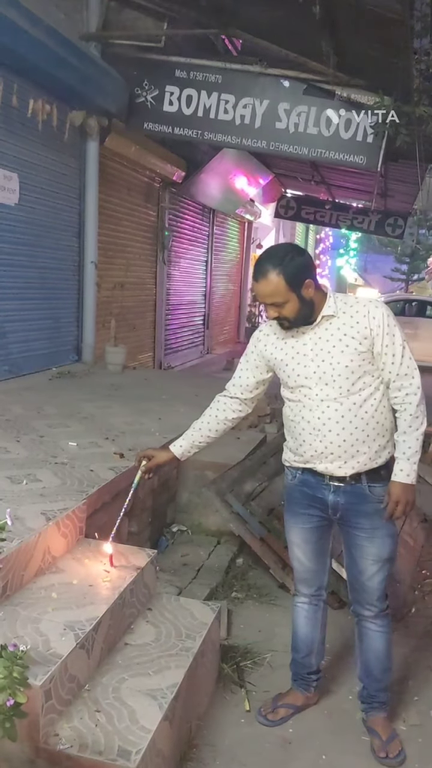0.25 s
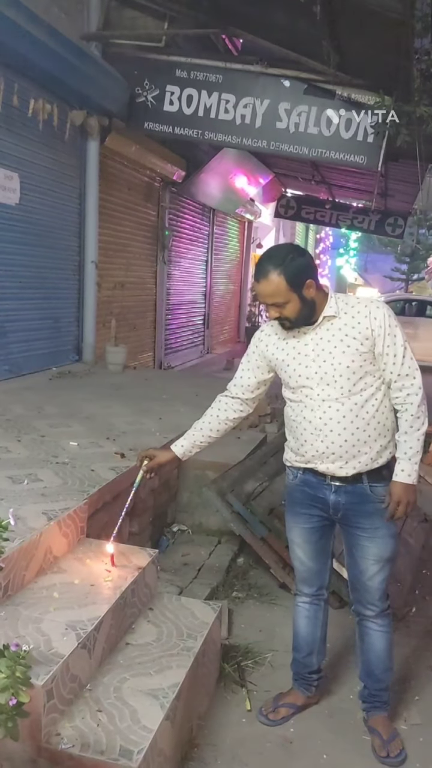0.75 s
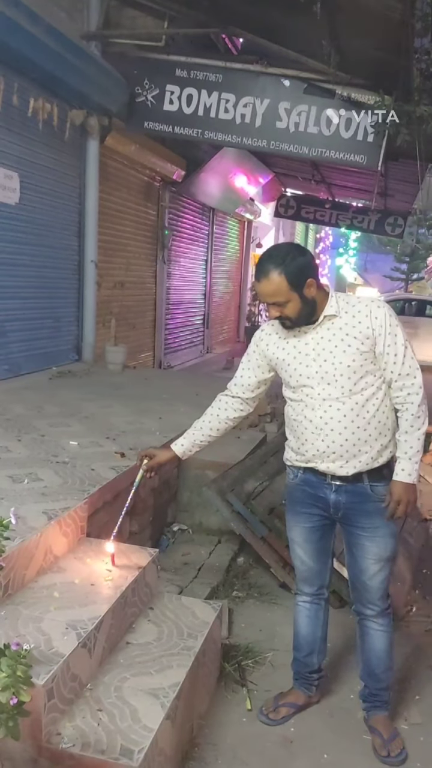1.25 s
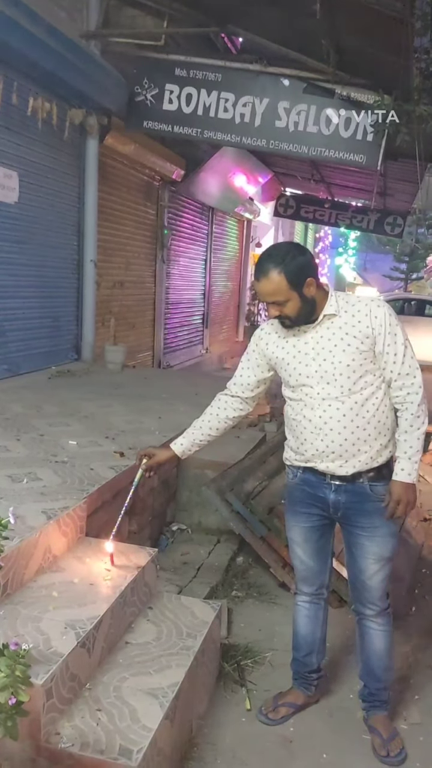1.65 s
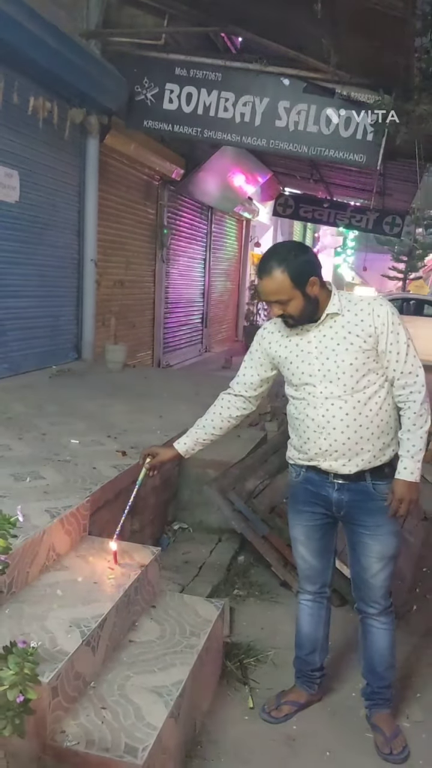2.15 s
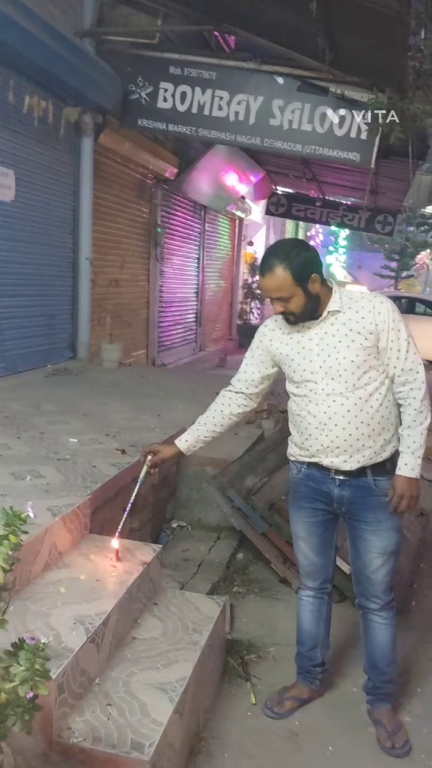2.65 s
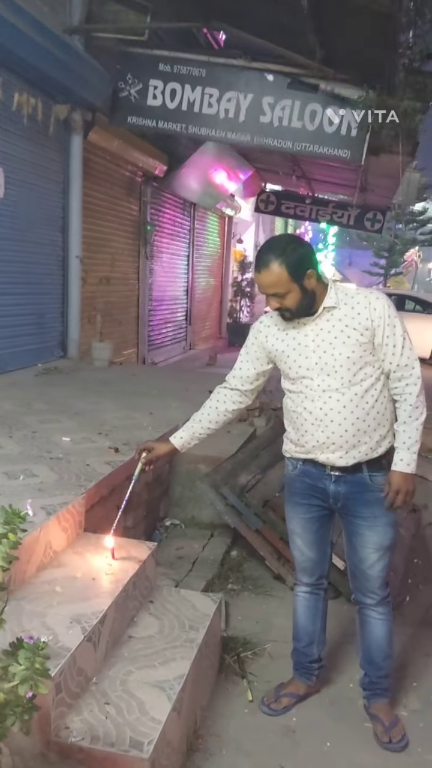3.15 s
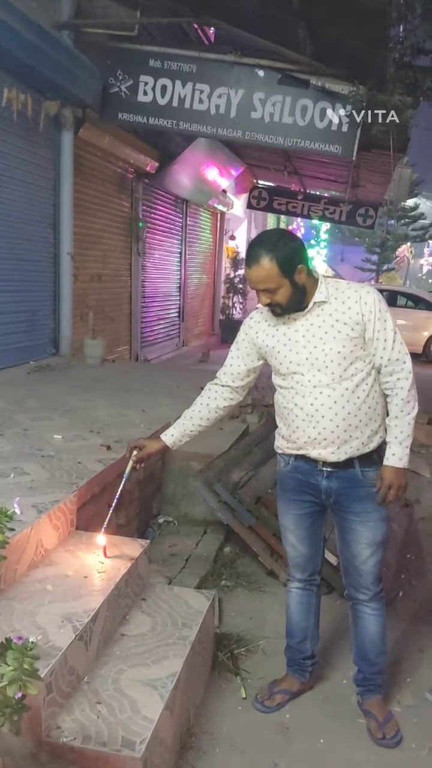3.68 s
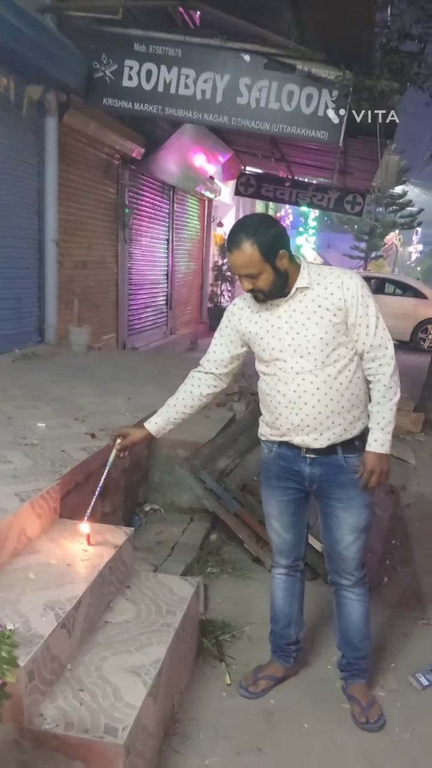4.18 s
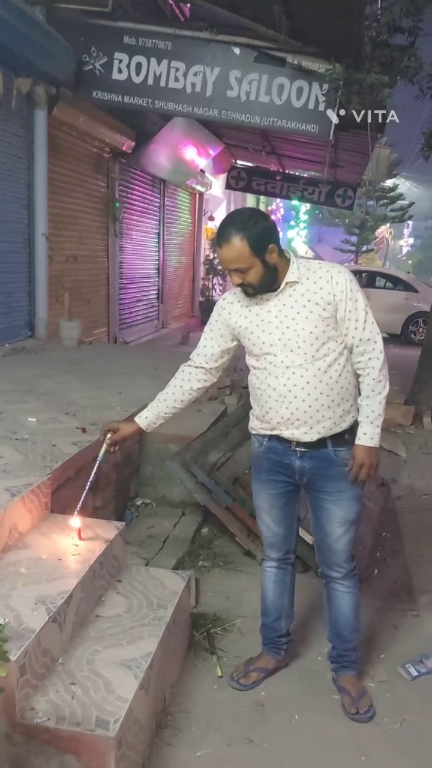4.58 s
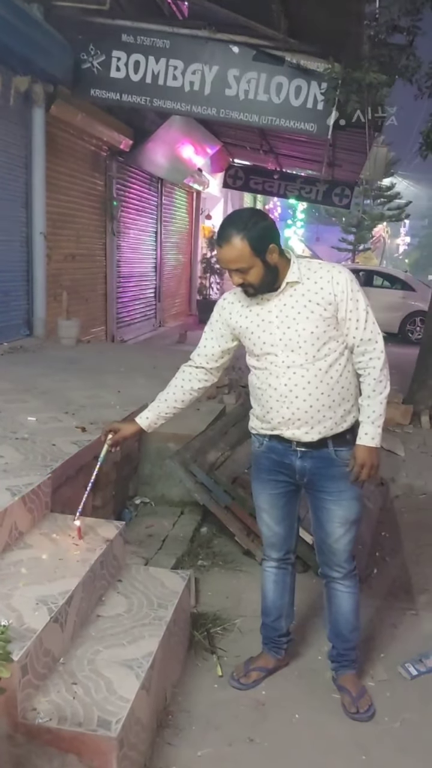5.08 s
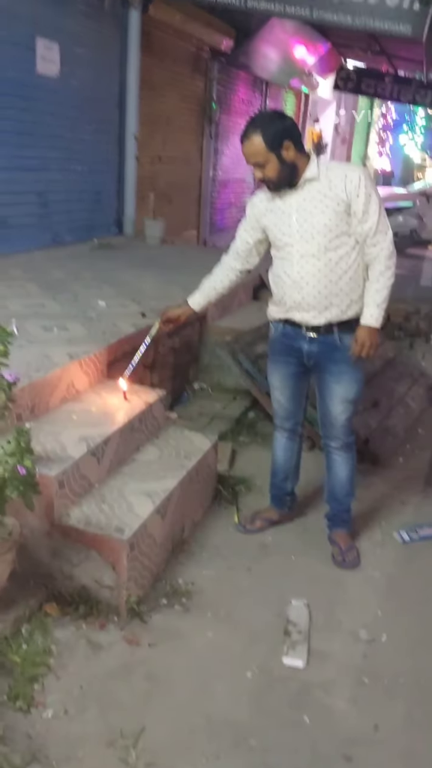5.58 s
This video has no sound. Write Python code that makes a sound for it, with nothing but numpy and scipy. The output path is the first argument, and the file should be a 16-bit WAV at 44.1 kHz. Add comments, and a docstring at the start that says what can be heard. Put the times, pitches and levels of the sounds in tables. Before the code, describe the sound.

A night street between houses, heard in stereo through a handheld microphone. Two firecrackers go off almost together at 0.0 and 0.2 seconds: dull thumps, sharp clustered cracks, a dense noisy burst, then a tail rolling down the street and losing its treble over more than a second. Under the tail a single-cylinder motorbike putters, becoming clear from about 1.6 and strongest near 2.0 with some chain and tyre hiss. Three bangs follow at 2.1, 2.25 and 2.65, the first boomier, the others harder. The bike's low buzzing hum climbs in pitch and drifts on. At about 3.8 a small hard object clacks faintly, three taps in quick succession. Thin cricket chirps show around 3.9 to 4.5. Strong bangs return at 4.5 and 4.9, slapping off the walls, while the bike fades from 4.4. A weaker, duller pop arrives at 5.8, right at the end. A low, steady town murmur continues throughout.

```python
"""Firecrackers go off round the corner of a night street. Each arrives first as a dull thump diffracted round the
houses, made of damped pressure steps; sharp cracks and a dense burst of shaped noise return from the house fronts,
and a tail that loses its treble rolls away down the street. A single-cylinder motorbike, pulses through silencer
resonances, pulls away behind them. Crickets chirp as pulsed narrow bands, something small clacks as struck modes,
and a coloured noise bed lies beneath as the town."""
import sys
import numpy as np
from scipy import signal
from scipy.fft import rfft, irfft, next_fast_len
from scipy.io import wavfile
from scipy.ndimage import uniform_filter1d, map_coordinates

SR = 44100
rng = np.random.default_rng(int(sys.argv[2]) if len(sys.argv) > 2 else 0)


def persist_wave(psi):
    """Save psi, clipped to +-1, as 16-bit WAV."""
    counts = np.round(np.clip(psi, -1, 1) * 32767).astype(np.int16)
    wavfile.write(sys.argv[1], SR, np.atleast_2d(counts).T)


N = 256820
TIME = np.arange(N) / SR  # s

# Firecrackers. Each row: arrival of the burst in seconds, lead of the thump in seconds, thump in dB,
# thump swing in Hz, alley rumble in dB, deep boom in dB, burst in dB, burst tilt in dB per octave,
# burst bass in dB, street tail in dB.
BANGS = [(0.0177, 0.032, -13, 280, -13, -27, -7.5, -2.5, 0, -15),
         (.190, 0.0042, -12, 210, -15, -33, -10, -2.1, 15, -19),
         (2.061, 0.0355, -5.5, 110, -16, -14.5, -12.5, -2.5, -2, -16),
         (2.2572, 0.0322, 1.5, 197, -12.5, -55, -7.5, -2.5, -3, -16),
         (2.6524, 0.028, -4.5, 198, -15.5, -32, -9.5, -1.5, 16.5, -16),
         (4.509, 0.0235, -1, 193, -9.5, -30.5, -9.5, -1.8, 6, -15),
         (4.880, 0.032, -5.5, 225, -17, -39, -8, -1.4, -8.5, -16),
         (5.7883, 0.0003, -11, 250, -17, -30, -10, -4, -36, -33)]
# Sharp wave fronts off the nearest walls. Each row: arrival in seconds, punch in dB, swing in Hz, shock snap in dB.
CRACKS = [(.0187, -2, 740, -31), (0.0213, -6, 710, -19), (.1865, -4, 450, -30), (0.1906, -0.5, 774, -5.5),
          (0.1937, -2.5, 1000, -20), (0.1966, -5, 890, -14), (.2092, -13, 600, -24), (.215, -2, 516, -22),
          (2.068, -2.5, 280, -31), (2.0708, -9, 600, -21), (2.0774, -8, 694, -21),
          (2.0829, -12, 1130, -10.5), (2.0858, -4.5, 690, -20), (2.249, -8, 1010, -13),
          (2.257, 0, 696, -18), (2.26, 1.5, 1140, -12), (2.6167, -10.5, 480, -38), (2.6425, -21, 700, -16),
          (2.6503, -6, 940, -19), (2.6539, 0.5, 960, -6), (4.4841, -7, 530, -28), (4.4909, -3, 172, -32),
          (4.5084, -5, 930, -16), (4.5167, -11, 824, -29), (4.5197, 2, 1120, -16), (4.8788, -2, 910, -16),
          (4.8826, 3, 860, -26), (4.8844, -9, 1100, -18), (4.8872, -2, 1110, -18), (5.7872, -14, 1110, -23)]
# Spectrum of the scatter behind each crack. Each row: frequency in Hz, level in dB.
SPRAY_COLOUR = [(100, -4), (700, 11), (1400, 20.5), (3000, -2), (9000, -14), (12000, -3), (16000, -25)]
# Flat far walls that slap the wave fronts back. Each row: delay in seconds, level in dB.
SLAP_WALLS = [(.087, -21), (.123, -19), (.188, -17), (.4, -29)]
# Reflection spectrum of those walls. Each row: frequency in Hz, level in dB.
SLAP_COLOUR = [(200, -9), (700, -1.5), (2000, -4), (4500, -13), (9000, -14), (15000, -24)]
# Spectrum of the rumble between the nearest walls. Each row: frequency in Hz, level in dB.
ALLEY_COLOUR = [(30, -36), (70, -40), (160, 13.5), (280, 11.5), (700, -0.5), (2000, -14.5), (6000, -27),
                (15000, -40)]
# Spectrum of the deep boom, also of the road rumble. Each row: frequency in Hz, level in dB.
BOOM_COLOUR = [(20, -57), (45, -2), (70, 6), (130, 1), (300, 5), (2000, -79)]
# Spectrum of the near burst. Each row: frequency in Hz, level in dB.
BURST_COLOUR = [(24, -57), (40, -106), (112, -5.5), (179, -18.5), (261, 6), (390, -5.5), (596, -5.5),
                (1260, -11), (1980, -20), (3030, -21), (3520, -24), (7450, -31), (8660, -39.5),
                (12600, -29.5), (15800, -42)]
# Spectrum of the street tail. Each row: frequency in Hz, level in dB.
TAIL_COLOUR = [(24, -63), (40, -24.5), (123, -10.5), (203, -4.5), (236, 0), (289, -1.5), (692, -11.5),
               (889, -15.5), (2030, -23), (2480, -29), (2880, -29.5), (7830, -42), (8660, -50),
               (11700, -46.5), (15800, -63)]
# Reverberation of the street. Each row: frequency in Hz, time to fall by 60 dB in seconds.
STREET_T60 = [(80, 3.15), (300, 1.58), (1000, 2.015), (3000, 1.85), (7000, 1.31), (14000, 1.14)]
# House fronts that answer late. Each row: delay in seconds, spread in seconds, level against the tail in dB.
FAR_FRONTS = [(.086, .008, -15), (.192, .012, -11), (.24, .012, -15), (.4, .02, -22)]
# Doorways and recesses that colour every bang. Each row: frequency in Hz, width in Hz, level in dB.
RECESS_MODES = [(306, 28, -11.5), (615, 124, -11), (1198, 51, -7.5), (1870, 79, -16), (3020, 400, -9),
                (4880, 930, -9.5), (7630, 160, 1.5)]
# Balance given by the walls on either side. Each row: frequency in Hz, left minus right in dB.
LEAN = [(60, 2.5), (110, -0.5), (200, 1), (380, -2.5), (700, 2), (1290, -4.5), (2380, -1.5), (4400, 0.5),
        (8120, 4), (15000, -0.5)]
# Stereo width of diffuse sound. Each row: frequency in Hz, side minus mid in dB.
WIDTH = [(60, -17), (140, -16.5), (280, -10.5), (550, -4.5), (1100, -2.5), (2200, 0), (5000, 0),
         (12000, -5)]
# Firing rate of the motorbike. Each row: time in seconds, firings per second.
ENGINE_SPEED = [(0, 17.5), (1, 18.8), (1.4, 20.5), (1.8, 22.7), (2.5, 27), (3, 29.7), (3.15, 30.05),
                (3.63, 30.8), (4, 30.65), (4.4, 31.5), (5.3, 33.5), (5.82, 35.5)]
# Exhaust loudness as the throttle opens and closes. Each row: time in seconds, level in dB.
THROTTLE = [(0, -31.5), (0.7, -48.5), (1.25, -45.5), (1.649, -34.5), (2.0, -23), (2.5, -30), (3.1, -31.5),
            (3.9, -31.5), (4.42, -27.5), (5.4, -43.5), (5.82, -52)]
# Silencer resonances. Each row: frequency in Hz, width in Hz, level in dB.
EXHAUST_MODES = [(84, 22, -9), (122, 16, -1), (157, 16, -3), (212, 22, -2), (244, 26, -3.5),
                 (292, 50, -3.5), (380, 70, -10.5), (600, 300, -23)]
# Shift of the hum between resonances as the bike moves. Each row: time in seconds,
# then the added level in dB of the 122, 157, 212, 244 and 292 Hz resonances.
HUM = [(0.9, 13, 1, 4, -2, 4), (1.55, 10.5, 2, 2, 3.5, 0), (1.8, -2, 6.5, 0.5, 3, 2),
       (2.0, 6, 5.5, -5, 1, -2), (2.6, -5, 8, -1, 5, 1), (3.0, 1, 0, 1, 4, 6), (3.25, 0, 1, 5.5, -9, 0.5),
       (3.45, -3, -1, 4, 2.5, -1.5), (3.8, -1, -13, -9, -7, -1), (4.1, -1.5, 2.5, 2, -0.5, 3.5),
       (4.42, -0.5, 2, 1, -14, 1), (5.4, -1, -6, -2, 2, 4)]
# Spectrum of silencer and distance. Each row: frequency in Hz, level in dB.
SILENCER_COLOUR = [(30, -18), (90, -8), (120, 0), (330, 0), (600, -6), (2000, -22), (8000, -45)]
# Walls that mirror the bike. Each row: delay in seconds, level in dB.
BIKE_ECHOES = [(.0081, -11), (.0205, -11), (.0455, -12), (.0895, -13)]
# Loudness of chain and tyres. Each row: time in seconds, level in dB.
ROLLING_LEVEL = [(0, -33), (0.7, -60), (1.25, -49.5), (1.45, -46.5), (1.65, -39.5), (1.85, -36),
                 (2.0, -29.5), (2.5, -42), (3.1, -39), (3.9, -47), (4.42, -37), (5.4, -60), (5.82, -52)]
# Spectrum of the chain and tyre hiss. Each row: frequency in Hz, level in dB.
HISS_COLOUR = [(240, -67), (400, -3.5), (634, -9), (976, -9.5), (1500, -12.5), (2170, -20.5), (3290, -23.5),
               (3780, -25), (6670, -28.5), (7310, -27), (9210, -35.5), (11400, -30), (15800, -34.5)]
# Taps of the small hard thing. Each row: time in seconds, relative level in dB.
CLACKS = [(3.77, -30.5), (3.7835, -31), (3.790, -27)]
# Its modes of vibration. Each row: frequency in Hz, width in Hz, level in dB.
CLACK_MODES = [(1380, 180, -6), (2390, 190, 6), (2770, 320, 0), (3650, 130, -2), (4050, 150, -9),
               (4800, 360, -6)]
# Nearer insects. Each row: start in seconds, length in seconds, pitch in Hz, level in dB.
CHIRPS = [(0.762, 0.066, 3200, -59), (1.65, 0.16, 3212, -59), (1.704, 0.054, 7020, -53),
          (3.861, .065, 7100, -56), (4.058, .05, 3212, -56), (4.154, 0.043, 7050, -49.5),
          (4.301, .09, 3200, -56.5), (4.304, .08, 11130, -56), (4.312, 0.062, 7050, -46.5),
          (4.369, 0.033, 6900, -49), (4.425, 0.056, 7000, -52), (4.455, .04, 11150, -55),
          (4.758, 0.066, 11130, -61), (5.16, 0.049, 7000, -57), (5.399, 0.089, 7100, -60),
          (5.696, 0.075, 7000, -61)]
# Far insects. Each row: pitch in Hz, width of one resonance in Hz, starting level in dB, chirps per second,
# nominal time of one chirp in seconds, level change in dB per second, share left between chirps from 0 to 1.
CHORUS = [(3212, 60, -59.5, 7.6, .99, -1.3, .55), (7060, 110, -66, 11.5, 1.01, -.1, .3),
          (11110, 130, -66.5, 7.0, .985, -.4, .15)]
# Spectrum of the town. Each row: frequency in Hz, level in dB.
TOWN_COLOUR = [(15, -49), (25, -24), (80, -0.5), (148, -3), (194, -2), (283, 1.5), (790, -17),
               (3210, -31.5), (6480, -40.5), (8960, -45), (11400, -40.5), (15800, -57)]

THUMP_CUT_RATIO = 7  # low-pass corner over swing frequency
RUMBLE_DECAY_S, BOOM_DECAY_S = 0.055, 0.19
STROKES_PER_S, STROKE_DEPTH = 52, .5
TOWN_DB = -41.5
TOP_HZ = 15800


def undb(db):
    """Level in decibels becomes amplitude gain."""
    return 10 ** (np.asarray(db) / 20)


def unit(x):
    """Normalisation to rms 1."""
    return x / np.sqrt(np.mean(x ** 2))


def freqs(size):
    """Frequencies of the Fourier bins for a signal of this many samples, held to at least 1 Hz."""
    return np.maximum(np.fft.rfftfreq(size, 1 / SR), 1)


def read(points, hz):
    """Interpolation of (Hz, value) points on a logarithmic frequency axis."""
    f, value = np.transpose(points)
    return np.interp(np.log(hz), np.log(f), value)


def colour(x, points):
    """Linear filtering: the spectrum is multiplied by a (Hz, dB) response."""
    size = next_fast_len(x.shape[-1], True)
    gain = undb(read(points, freqs(size)))
    return irfft(rfft(x, size) * gain, size)[..., :x.shape[-1]]


def spread(pair):
    """Diffuse-field coherence: left and right are alike in the bass and apart in the treble."""
    side = colour(pair[1], WIDTH)
    return np.array([pair[0] + side, pair[0] - side])


def noise(points):
    """Diffuse stereo noise of a given spectrum, rms 1."""
    return unit(colour(spread(rng.standard_normal((2, N))), points))


def lowpass(x, hz, order=2):
    """Butterworth low-pass."""
    return signal.sosfilt(signal.butter(order, min(hz, SR / 2 - 1), fs=SR, output="sos"), x)


def ring(x, modes):
    """Modal superposition: parallel (Hz, width Hz, dB) resonances with alternating sign."""
    total = 0
    for k, (hz, width, db) in enumerate(modes):
        b, a = signal.iirpeak(hz, hz / width, fs=SR)
        total = total + (-1) ** k * undb(db) * signal.lfilter(b, a, x + 1e-18)
    return total


def walk(rate):
    """Random fluctuation: normal draws joined by lines, rate per second; the last of 8192 is then held."""
    steps = rng.standard_normal(8192)
    return np.interp(TIME * rate, np.arange(len(steps)), steps)


def add(out, s, x):
    """Superposition: x is mixed into out from s seconds on."""
    start = int(np.clip(s * SR, 0, N - 1))
    out[..., start:start + x.shape[-1]] += x[..., :N - start]


def blast(hz, cut_hz, damping, lag_s):
    """Blast wave: a sudden pressure step swings out and decays, reaching the left channel first."""
    t = TIME[:SR // 20] - np.array([[0], [abs(lag_s)]])
    wave = (t >= 0) * np.cos(2 * np.pi * hz * t) * np.exp(-damping * hz * np.abs(t))
    return -lowpass(wave, cut_hz)


def fronts(edge_db=-12, spray_db=-15, fizz_db=-11, fizz_s=0.001):
    """Diffraction dulls the thump bent round the corner; reflection gives sharp cracks with scatter off each wall."""
    out, t = np.zeros((2, N)), TIME[:SR // 20]
    edge = blast(700, 4500, damping=2.5, lag_s=0.00054)
    # the steep shock itself carries the top octaves
    snap = blast(3400, 22000, damping=0.99, lag_s=0.00018)
    for s, lead_s, thump_db, thump_hz, *_ in BANGS:
        thump = blast(thump_hz, THUMP_CUT_RATIO * thump_hz, damping=0.99, lag_s=0.0002)
        add(out, s - lead_s, undb(thump_db) * (thump + undb(edge_db) * edge))
    for s, punch_db, hz, snap_db in CRACKS:
        punch = blast(hz, 2300, damping=1.0, lag_s=0.00014)
        spray = colour(rng.standard_normal((2, len(t))), SPRAY_COLOUR) * np.exp(-t / 0.0057)
        fizz = spread(rng.standard_normal((2, len(t)))) * np.exp(-t / fizz_s)
        add(out, s, undb(punch_db) * (punch + 0.5 * undb(spray_db) * spray))
        add(out, s, undb(snap_db) * (snap + undb(fizz_db) * fizz))
    return out


def bursts(hold_s=0.027, treble_hold_s=0.048, bass_rise_s=0.016, tail_rise_s=0.016):
    """Multiple scattering by near house fronts, then reverberation down the street that loses its treble."""
    out, t = np.zeros((2, N)), TIME[:2 * SR]
    centres = np.geomspace(60, 14000, 9)  # Hz
    # overlapping triangular bands on the log-frequency axis
    bands = [read(np.column_stack([centres, row]), freqs(len(t))) for row in np.eye(len(centres))]
    far = 1 + sum(undb(db) * np.exp(-((t - s) / width) ** 2) for s, width, db in FAR_FRONTS)
    for s, *_, db, tilt_db, bass_db, tail_db in BANGS:
        near = rfft(unit(colour(scatter(t, sparse_db=8.5, merge_s=0.031), BURST_COLOUR)))
        street = rfft(unit(colour(scatter(t, sparse_db=4, merge_s=0.46), TAIL_COLOUR)))
        for hz, band in zip(centres, bands):
            gain = undb(db + tilt_db * np.log2(hz / 500) + bass_db / (1 + (hz / 200) ** 2))
            hold = read([(300, hold_s), (10000, treble_hold_s)], hz)
            # the lows build up slowly between the walls; the highs rise much faster
            rise = 1 - np.exp(-t / (0.0029 + bass_rise_s / (1 + hz / 600)))
            burst = rise / np.sqrt(1 + (t / hold) ** 4) * np.exp(-t / 0.2)
            tail = (1 - np.exp(-t / tail_rise_s)) * far * undb(-60 * t / read(STREET_T60, hz))
            add(out, s, gain * burst * irfft(near * band))
            add(out, s, undb(tail_db) * tail * irfft(street * band))
    return out


def scatter(t, sparse_db, merge_s):
    """Growth of echo density: very uneven echoes arrive in clumps and merge into a wash as they multiply."""
    unevenness = undb(sparse_db * np.exp(-t / merge_s) * rng.standard_normal(len(t)))
    # equal power over each 10 ms
    unevenness /= np.sqrt(uniform_filter1d(unevenness ** 2, SR // 100))
    clumps = undb(1.4 * walk(210)[:len(t)])
    echoes = spread(rng.standard_normal((2, len(t))) * unevenness * clumps)
    return tint(echoes, patchy_db=3, patch_s=.05, patch_hz=130)


def tint(x, patchy_db, patch_s, patch_hz):
    """Selective reflection: narrow bands swell and sink by chance as wall echoes follow one another."""
    hz, t, bins = signal.stft(x, SR, nperseg=1024)
    chance = rng.standard_normal((256, 128))
    grid = np.meshgrid(hz / patch_hz, t / patch_s, indexing="ij")
    patches = map_coordinates(chance, grid, order=1, mode="wrap")
    # long waves are mirrored evenly
    depth_db = patchy_db * (hz / (hz + 400))[:, None]
    return signal.istft(bins * undb(depth_db * patches))[1][..., :x.shape[-1]]


def alley():
    """Reverberation in a narrow space: each thump rattles briefly between near walls and leaves a deep boom."""
    rumble, boom = np.zeros(N), np.zeros(N)
    rise = 1 - np.exp(-TIME / 0.005)
    for s, lead_s, _, _, rumble_db, boom_db, *_ in BANGS:
        add(rumble, s - lead_s, undb(rumble_db) * rise * np.exp(-TIME / RUMBLE_DECAY_S))
        add(boom, s - lead_s, undb(boom_db) * rise * np.exp(-TIME / BOOM_DECAY_S))
    return rumble * noise(ALLEY_COLOUR) + boom * noise(BOOM_COLOUR)


def slaps(wave_fronts):
    """Specular reflection: far walls return thumps and cracks as separate slaps, weaker in bass and top."""
    out, dulled = np.zeros((2, N)), colour(wave_fronts, SLAP_COLOUR)
    for delay, db in SLAP_WALLS:
        add(out, delay, undb(db) * dulled)
    return out


def recesses(bangs):
    """Cavity resonance: doorways and recesses ring with every bang."""
    return sum(ring(bangs, [mode]) for mode in RECESS_MODES)


def lean(pair):
    """Unequal reflection: the walls on either side favour different bands."""
    left, right = ([(hz, share * db) for hz, db in LEAN] for share in (.5, -.5))
    return np.array([colour(pair[0], left), colour(pair[1], right)])


def motorbike(puff_db=-3, road_db=-6):
    """Forced resonance: firings and gas turbulence drive the silencer; chain and tyres rattle, hiss and rumble."""
    curves = (ENGINE_SPEED, THROTTLE, ROLLING_LEVEL)
    firing_hz, exhaust_db, rolling_db = (np.interp(TIME, *np.transpose(curve)) for curve in curves)
    cycles = np.cumsum(firing_hz) / SR + .0015 * walk(25)
    firings = np.diff(np.floor(cycles), prepend=np.floor(cycles[0])) * undb(.8 * walk(30))
    # wall echoes fill the gaps between the beats
    echoes = sum(undb(db) * np.interp(TIME - delay, TIME, firings, left=0) for delay, db in BIKE_ECHOES)
    puffs = unit(1 + undb(puff_db) * np.exp(-(cycles % 1) / 8.4))
    # turbulent gas roughens the same resonances that the firings ring
    turbulence = puffs * spread(rng.standard_normal((2, N)))
    drive = unit(firings + echoes) + undb(-22) * turbulence
    times, *levels = np.transpose(HUM)
    # the first resonance and those above the hum stay steady
    swell_db = [0] + [np.interp(TIME, times, db) for db in levels] + [0] * len(EXHAUST_MODES)
    pipe = sum((-1) ** k * undb(swell_db[k]) * ring(drive, [mode]) for k, mode in enumerate(EXHAUST_MODES))
    exhaust = unit(colour(pipe, SILENCER_COLOUR))
    rattle = unit(undb(2.8 * walk(1800) + 1 * walk(60)))
    rolling = puffs * rattle * noise(HISS_COLOUR) + undb(road_db) * noise(BOOM_COLOUR)
    return undb(exhaust_db) * exhaust + undb(rolling_db + 1 * walk(14)) * rolling


def clacks(strength_db=15, echo_db=-22):
    """Impact excitation: a small hard thing knocks three times in quick succession and its modes ring."""
    taps, t = np.zeros((2, N)), TIME[:SR // 5]
    contact = np.exp(-t / 0.0016) + undb(echo_db) * np.exp(-t / 0.04)
    for s, db in CLACKS:
        add(taps, s, undb(db + strength_db) * contact * rng.standard_normal((2, len(t))))
    return ring(taps, CLACK_MODES)


def wing_strokes():
    """Amplitude modulation: each wing stroke dips the level, at a slightly wandering rate."""
    return 1 - STROKE_DEPTH * np.sin(np.pi * (STROKES_PER_S * TIME + .2 * walk(8))) ** 2


def crickets():
    """Stridulation: wing resonances pulsed by strokes, in a far chorus of loose rhythm and a few nearer chirps."""
    out = np.zeros((2, N))
    for hz, width, db, rate, s, fade, between in CHORUS:
        mode = [(hz, width, 0)]
        # two resonances in series narrow the band
        wings = ring(ring(spread(rng.standard_normal((2, N))), mode), mode)
        rhythm = np.cos(2 * np.pi * (rate * (TIME - s) + .17 * walk(6)))
        chirping = np.clip(.9 + rhythm, between, 1)
        out += undb(db + fade * TIME) * unit(wings * chirping * wing_strokes() * undb(1.5 * walk(5)))
    for s, length, hz, db in CHIRPS:
        count = int(length * SR)
        # the pitch wavers
        phase = 2 * np.pi * np.cumsum(hz + 55 * walk(400)) / SR
        tone = np.sin(phase) * wing_strokes()
        add(out, s, undb(db) * unit(tone[:count]) * signal.windows.tukey(count, .4))
    return out


def town():
    """Diffuse background: steady coloured noise whose level wanders slightly."""
    return undb(TOWN_DB + 1 * walk(3)) * noise(TOWN_COLOUR)


def scene():
    """Superposition of the bangs and the night street."""
    wave_fronts = fronts()
    bangs = wave_fronts + slaps(wave_fronts) + alley() + bursts()
    bangs = bangs + recesses(bangs)
    return lean(bangs) + motorbike() + clacks() + crickets() + town()


def record(dry):
    """Band limiting and saturation: the deepest bass is thinned, loud peaks are rounded and the top is cut."""
    thinned = signal.sosfilt(signal.butter(2, 36, "high", fs=SR, output="sos"), dry)
    rounded = np.tanh(1.05 * thinned) / 1.05
    return signal.sosfilt(signal.ellip(10, .2, 80, TOP_HZ, fs=SR, output="sos"), rounded)


dry = scene()
out = record(dry)
persist_wave(out)
```